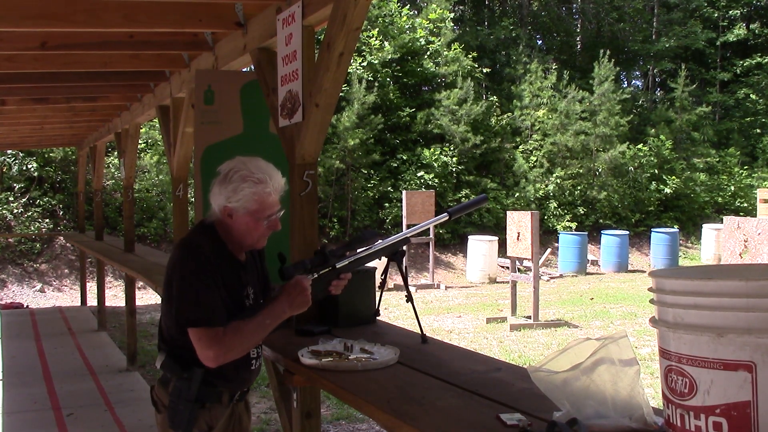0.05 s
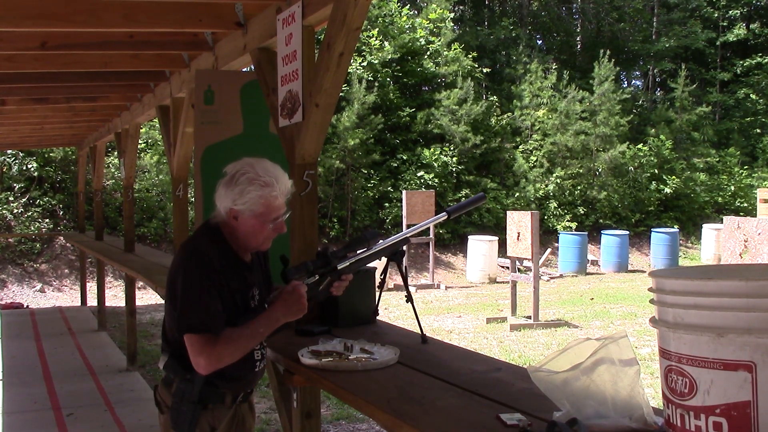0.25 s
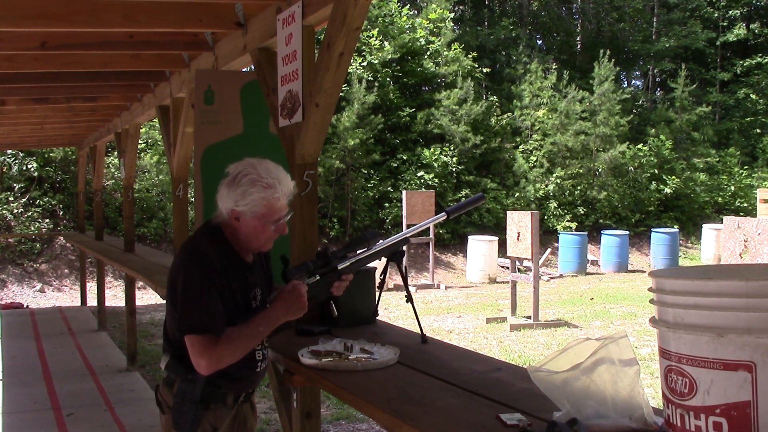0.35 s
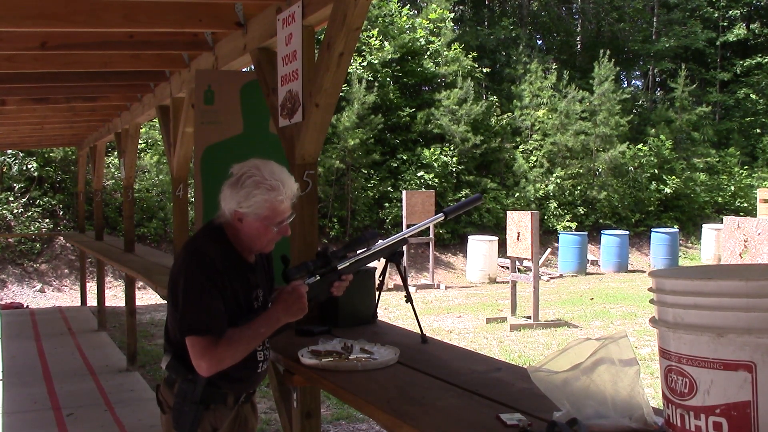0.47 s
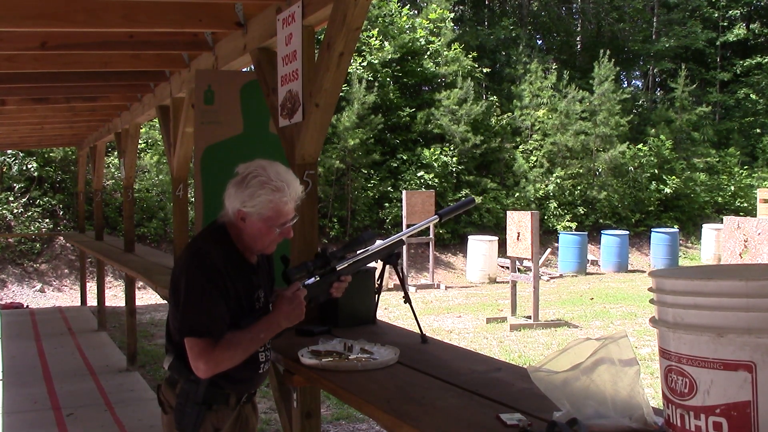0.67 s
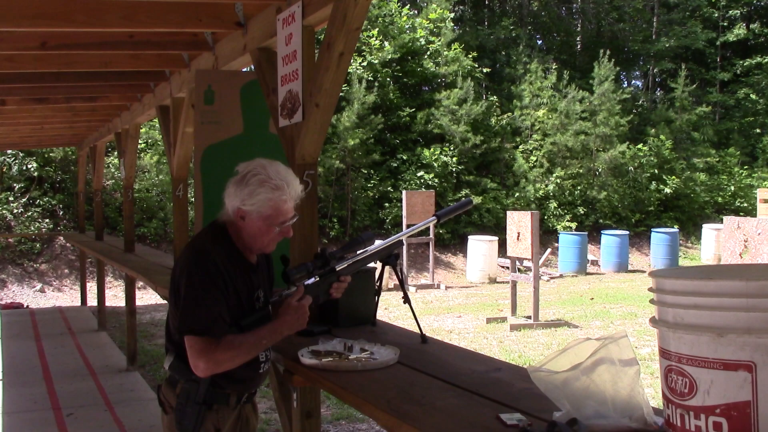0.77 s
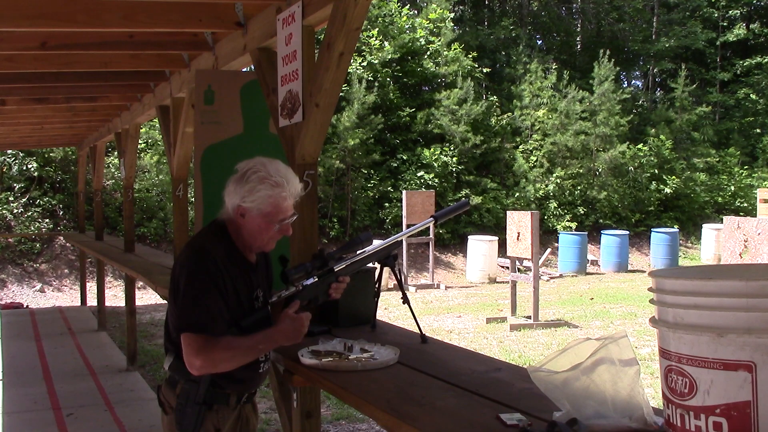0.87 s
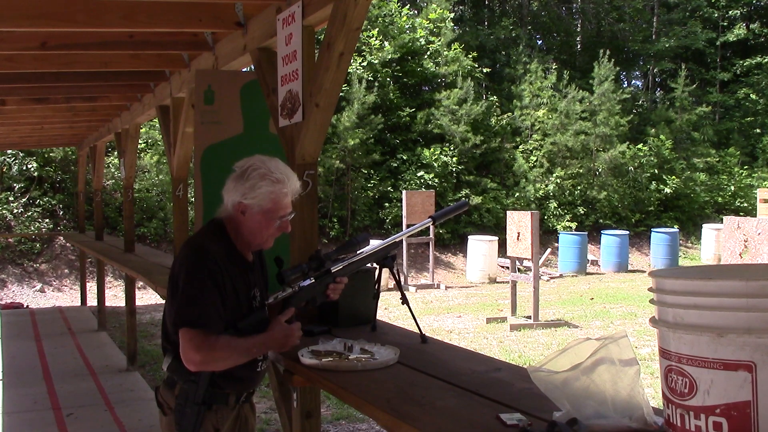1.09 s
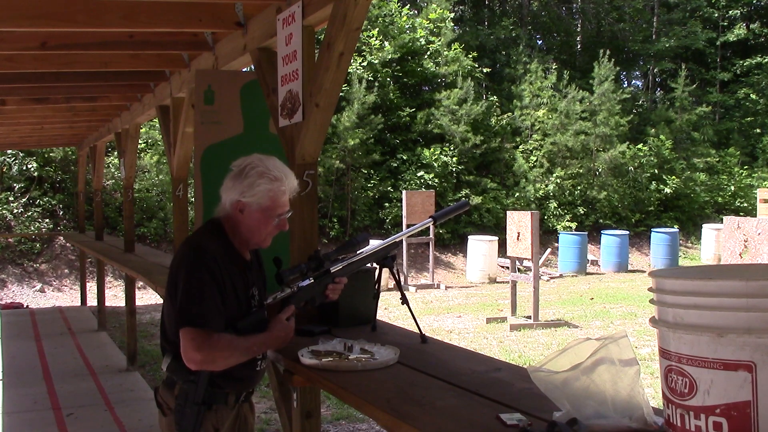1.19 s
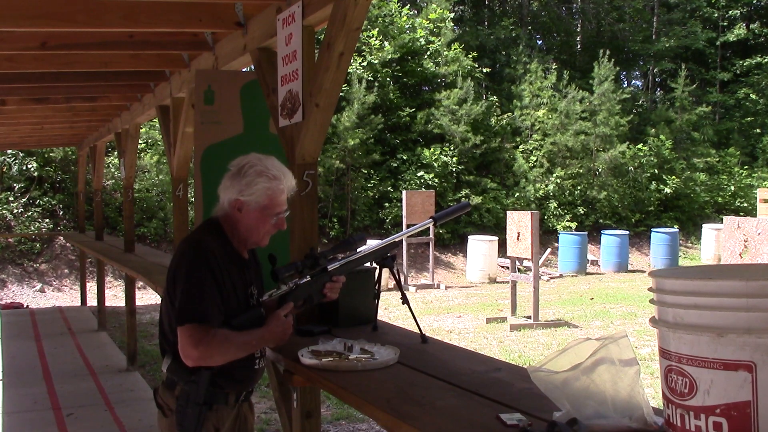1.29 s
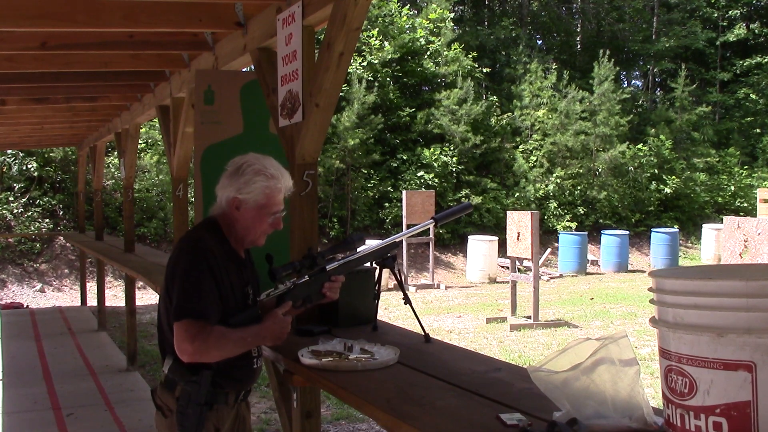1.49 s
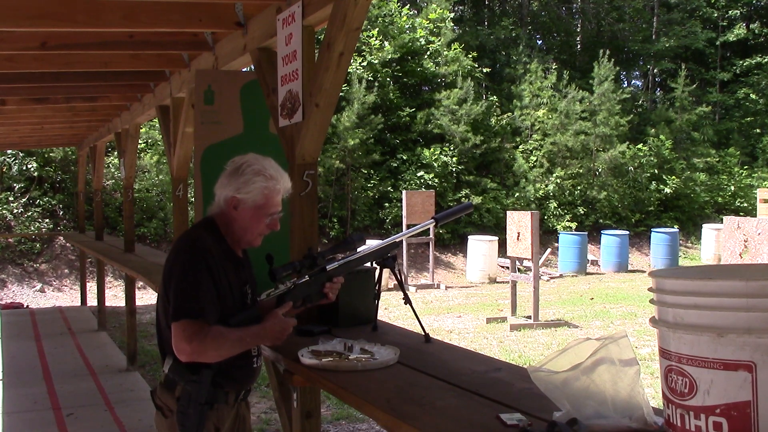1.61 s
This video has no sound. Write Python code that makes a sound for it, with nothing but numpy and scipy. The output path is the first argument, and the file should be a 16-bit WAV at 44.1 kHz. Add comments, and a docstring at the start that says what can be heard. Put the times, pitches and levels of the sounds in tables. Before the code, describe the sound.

Sharp metallic bolt clack, then an ejected cartridge case tinkles and knocks loudly on wooden planks

```python
"""First come a low drone, outdoor air and faint steel clicks: a rifle bolt is worked under a wooden shelter.
A spent brass case is flung out ringing, clacks onto the wooden bench, bounces and rolls; small clicks
and rustle of handling follow. Blows are noise bursts plus dying sines; the case is pairs of beating sines;
roll, rustle, air and drone are shaped noise, and the shelter adds sparse reflections.
Two close microphones: the right input is much weaker and adds its own hiss."""
import sys
import numpy as np
from scipy import signal
from scipy.fft import rfft, irfft
from scipy.io import wavfile
from scipy.ndimage import uniform_filter1d

SR = 44100
rng = np.random.default_rng(int(sys.argv[2]) if len(sys.argv) > 2 else 0)


def waveform_to_disk(signal):
    """Save audio, clipped to [-1, 1], as 16-bit WAV at the path in sys.argv[1]."""
    frames = np.transpose(np.atleast_2d(signal))
    scaled = np.clip(frames, -1, 1) * 32767
    samples = np.round(scaled).astype(np.int16)
    wavfile.write(sys.argv[1], SR, samples)


def volts_from_decibels(level):
    """Turn decibel levels (scalar or array-like) into linear amplitude factors."""
    exponent = np.asarray(level, float) / 20
    return 10 ** exponent


N = 72765  # length in samples

# Source levels below are set before the input gains, except the right hiss, which is added after them.
# colour of the outdoor air: (frequency [Hz], relative level [dB per Hz])
AIR_COLOUR = [(15, -42.5), (25, -7.5), (134, -17), (242, -6), (301, -6), (754, -13.5), (1480, -16.5),
              (2280, -16.5), (2910, -17), (6380, -22), (16000, -29)]
# loudness of the low drone: (time [s], level [dB])
DRONE_LEVEL = [(0.0, -54), (0.086, -51), (0.5, -54.5), (0.518, -64), (0.532, -39.5), (0.596, -69.5),
               (0.812, -66.5), (1.548, -59), (1.65, -56.5)]
# humps in the drone's spectrum: (frequency [Hz], width [Hz], relative level [dB])
DRONE_HUMPS = [(75, 22, -.1), (125, 28, -2), (163, 24, -6)]
# steel clicks of the action and of handling:
# (time [s], level of the noise [dB], tilt, at most 12 [dB per octave], t60 of the noise [s],
#  ring relative to the noise [dB])
STEEL_CLICKS = [(.0024, -45.5, -2, 0.26, -0.5), (.0548, -28, -4, 0.1, -1), (.085, -40, -4.5, 0.094, -33),
                (.11, -46, -1, 0.18, 5), (.2086, -19.5, 8, 0.04, -2.5), (.2144, -4, 12.5, .012, -62),
                (.219, -16, -0.7, 0.1, -15.5), (.258, -28, 4, .04, -26), (.2765, -23.5, -3.5, 0.15, -3),
                (.288, -18.5, 5, 0.016, -26), (.309, -38, 4, .05, 4), (.321, -39.5, -1.5, .06, -4),
                (.9835, -48, -6.5, 0.029, -27), (.9905, -46.5, 1, 0.11, -26), (1.0515, -51, 26, 0.015, -18),
                (1.079, -49, 2, 0.03, -4), (1.118, -49.5, -4.5, .03, -1), (1.274, -45.5, -0.5, .02, 0),
                (1.3175, -38.5, 6.5, .04, -30), (1.3498, -39, -3, 0.033, 6.5),
                (1.3985, -45.5, -1.5, 0.031, 9.5), (1.413, -44, 1, 0.061, -14),
                (1.5365, -50, -12.5, .04, -7), (1.57, -44.5, 23.5, 0.017, -36)]
# colour of a steel click: (frequency [Hz], relative level [dB per Hz])
STEEL_COLOUR = [(120, -48), (200, -16), (527, -20), (1030, -30), (1320, 3.5), (7310, -2.5), (9150, -5.5),
                (10700, -13), (12500, -7.5), (16200, -40), (22000, -120)]
# ringing tones of the action: (frequency [Hz], relative level [dB], t60, shortened to 0.01 in use [s])
ACTION_MODES = [(990, -2, 0.016), (1241, 7.1, 0.014), (1960, -15, 0.058), (2690, -6.5, 0.038),
                (3890, -11, .03), (4130, 0.5, 0.025), (4630, -15.5, .03)]
# echo decay of the shelter, at least 0.03 s in use: (frequency [Hz], t60 [s])
SHELTER_DECAY = [(150, 0.33), (530, 0.34), (1390, 0.35), (3680, 0.28), (8000, 0.3), (11500, 0.17),
                 (16000, 0.057)]
# the case is struck: (time [s], ringing time [s], then five levels [dB], for the families
#  near 6.5, 9.4, 13.1, 14.5 and 13.2 kHz)
CASE_STRIKES = [(.2144, .0146, -45, -33, -50, -38, -8), (.2297, .293, -55, -42, -23, -38, -21),
                (.258, .265, -46, -46, -34, -33, -60), (.308, .215, -42, -41, -46, -48, -70),
                (.568, .15, -70, -60, -43, -39, -60), (.608, .11, -66, -52, -52, -62, -70),
                (.742, .31, -68, -58, -60, -70, -75), (.808, .24, -72, -66, -63, -72, -72),
                (.862, .19, -72, -68, -65, -66, -75), (.92, .13, -76, -72, -72, -72, -80),
                (.988, .063, -56, -72, -75, -75, -80), (.999, .052, -62, -58, -69, -72, -70)]
# tones of the brass case, close beating partners, one entry each: (frequency [Hz])
CASE_HZ = [4580, 6471, 6530, 9414, 9436, 10930, 13060, 13105, 13130, 14522, 14563, 13156, 13289]
# which family each tone belongs to: (family number)
CASE_FAMILY = [0, 0, 0, 1, 1, 1, 2, 2, 2, 3, 3, 4, 4]
# strength of each tone within its family: (relative level [dB])
CASE_DB = [-10, 0, -8, -8, 0, -11, -12, 0, -8, 0, -6, 0, -15]
# how long each tone takes to fade by 60 dB: (t60 [s])
CASE_T60_S = [.4, .4, .3, .35, .36, .3, .15, .24, .3, .26, .24, .15, .06]
# knocks on the bench: (time [s], level of the ring [dB], tilt, at most 5 [dB per octave],
#  t60 of the crack [s], crack relative to the ring [dB])
BENCH_KNOCKS = [(.2762, -29.5, -6.5, 0.05, -19), (.2886, -31.5, -13, 0.039, -20),
                (.5233, -0.5, 2.4, 0.064, -5.5), (.532, -6, 1, 0.085, -8.5), (.551, -21, 8, 0.054, 0),
                (.5695, -18.5, 0, 0.036, 4), (.58, -23.5, 5, 0.09, -3.5), (.6093, -14.5, 1, 0.068, -1),
                (.648, -53, -16, .02, -5), (.68, -37, -2, 0.072, 7), (.7165, -23, 1, 0.061, 4),
                (1.568, -53.5, -22, 0.022, 9)]
# colour of the dry crack of wood: (frequency [Hz], relative level [dB per Hz])
CRACK_COLOUR = [(59, -66.5), (100, -30.5), (389, -2), (481, 0), (970, -1.5), (1250, -7.5), (1650, -8),
                (2170, -13.5), (3700, -15.5), (15000, -36.5), (16000, -68.5)]
# ringing tones of the bench top: (frequency [Hz], relative level [dB], t60, shortened in the roll [s])
BENCH_MODES = [(125, -20, .08), (240, -17, .06), (313, -12, .07), (466, -4, .07), (515, -6, .07),
               (591, 0, .08), (763, -12, .07), (900, -5, .07), (1000, -9, .06), (1350, -11, .05),
               (1500, -12, .04), (1640, -7, .05), (1845, -10, .04), (2274, -15, .04)]
# the case rumbles over the planks: (time [s], level [dB])
ROLL_LEVEL = [(0.77, -58), (0.866, -48.5), (0.878, -56), (1.016, -48), (1.126, -85), (1.14, -86),
              (1.15, -95)]
# handling rustle, one list per movement: (time [s], level [dB])
RUSTLE_LEVELS = [
    [(1.052, -50), (1.114, -67.5), (1.12, -70), (1.14, -83)],
    [(1.295, -78), (1.319, -54.5), (1.389, -65.5), (1.413, -55.5), (1.431, -61), (1.48, -57.5)],
    [(1.525, -78), (1.537, -55.5), (1.561, -71), (1.571, -58.5), (1.589, -60), (1.65, -73)],
]
# colour of the rustle: (frequency [Hz], relative level [dB per Hz])
RUSTLE_COLOUR = [(180, -31), (300, 5.5), (634, -2.5), (946, -6.5), (1390, -9), (3580, -18.5), (8790, -9.5),
                 (16000, -23)]

AIR_DB, SHELTER_DB = -63.5, -7.5  # air level; echoes relative to the dry sound
LEFT_DB, RIGHT_DB = 4, -17  # input gains
RIGHT_HISS_DB = -80.5
RIGHT_WET_DB, APART_HZ = -6.5, 2500  # share and lower edge of the right side's own reflections
MUTE_S, ONSET_S = .002, .0008  # fade-out and fade-in of each brass ring
TUMBLE_DB, TUMBLE_S = 3, .012  # depth and smoothing time of the flutter
GRIT = .6  # peak of the dry crack in each rolling bump, relative to the plank's ring
LOW_CUT_HZ, TOP_HZ = 258, 15900
CEILING = 1.0  # clipping level, full scale


def evened(x):
    """Scales to rms 1."""
    return x / np.sqrt(np.mean(x ** 2) + 1e-20)


def read(points, hz):
    """Reads a table on a log-frequency axis."""
    f, value = np.transpose(points)
    return np.interp(np.log(hz + 1), np.log(f + 1), value)


def level(curve):
    """Gain over time from a dB curve, fading to -110 dB outside it."""
    s, db = np.transpose(curve)
    times = np.r_[s[0] - .003, s, s[-1] + .02]
    return volts_from_decibels(np.interp(np.arange(N) / SR, times, np.r_[-110, db, -110]))


def add(mix, s, sound):
    """Mixes a sound in at time s."""
    part = mix[max(round(s * SR), 0):][:len(sound)]
    part += sound[:len(part)]


def highpass(x, hz):
    """Weakens everything below the given frequency."""
    return signal.sosfilt(signal.butter(2, hz, "high", fs=SR, output="sos"), x)


def coloured(white, points, tilt_db=0):
    """White noise shaped by a spectrum and a tilt around 2 kHz, at rms 1."""
    hz = np.fft.rfftfreq(len(white), 1 / SR)
    gain = volts_from_decibels(read(points, hz) + tilt_db * np.log2(hz / 2000 + 0.048))
    return evened(irfft(rfft(white) * gain, len(white)))


def ring(modes, t, tilt_db, pivot_hz, spot=1, longest_s=.15):
    """Dying sines, one per mode; spot weighs the modes by where the blow lands."""
    hz, db, t60 = np.transpose(modes)[:, :, None]
    db = db + tilt_db * np.log2(hz / pivot_hz) - 60 * t / np.clip(t60, .01, longest_s)
    return (np.reshape(spot, (-1, 1)) * volts_from_decibels(db) * np.sin(2 * np.pi * hz * t)).sum(0)


def burst(white, points, tilt_db, t60):
    """A sudden puff of noise through a filter of the given colour that only rings forward in time."""
    t, hz = np.arange(len(white)) / SR, np.fft.rfftfreq(len(white), 1 / SR)
    colour_db = read(points, hz) + tilt_db * np.log2(hz / 2000 + 0.085)
    # folding the cepstrum turns the gain into a minimum-phase filter
    fold = irfft(np.log(volts_from_decibels(np.maximum(colour_db, -90))))
    fold[1:len(t) // 2] *= 2
    fold[len(t) // 2 + 1:] = 0
    dying = white * volts_from_decibels(-60 * t / max(t60, .003))
    puff = irfft(rfft(dying) * np.exp(rfft(fold)))
    return puff / abs(puff).max()


def blows(table, modes, points, pivot_hz, rattle_s, longest_s, ring_first):
    """Each blow is a noise burst plus the body's modes, shaken by a short rattle at a varying spot."""
    out, t = np.zeros(N), np.arange(8192) / SR
    white = rng.standard_normal((len(table), 8192 + 2048 + len(modes)))
    rattle_fade = volts_from_decibels(-60 * t[:2048] / max(rattle_s, .001))
    for (s, db, tilt_db, t60, second_db), w in zip(table, white):
        tilt_db = min(tilt_db, 5 if ring_first else 12)
        spot = volts_from_decibels(w[10240:])  # each mode varies by about 1 dB
        body = ring(modes, t, tilt_db, pivot_hz, spot, longest_s)
        body = signal.fftconvolve(body, w[8192:10240] * rattle_fade)[:8192]
        body = body / abs(body).max()
        puff = burst(w[:8192], points, tilt_db, t60)
        first, second = (body, puff) if ring_first else (puff, body)
        add(out, s, volts_from_decibels(db) * (first + volts_from_decibels(second_db) * second))
    return out


def background():
    """Outdoor air as shaped noise, and a low wavering drone of noise in narrow bands."""
    hz = np.fft.rfftfreq(N, 1 / SR)
    bands = sum(volts_from_decibels(db) / (1 + (2 * (hz - f) / width) ** 2) for f, width, db in DRONE_HUMPS)
    drone = evened(irfft(rfft(rng.standard_normal(N)) * bands, N))
    air = volts_from_decibels(AIR_DB) * coloured(rng.standard_normal(N), AIR_COLOUR)
    return air + level(DRONE_LEVEL) * drone


def right_hiss():
    """Steady noise of the weak right input: the air's colour, tilted towards the treble."""
    return volts_from_decibels(RIGHT_HISS_DB) * coloured(rng.standard_normal(N), AIR_COLOUR, 1.5)


def action_clicks():
    """Steel parts meet: bursts of noise lead, with the short ring of the action added."""
    return blows(STEEL_CLICKS, ACTION_MODES, STEEL_COLOUR, 1500, rattle_s=0.023, longest_s=0.01,
                 ring_first=False)


def shelter(x):
    """Sparse random reflections from roof and posts, each band dying at its own speed."""
    taps = np.zeros((2, SR // 2))
    at = np.arange(100, SR // 2 - 20, 12)  # one reflection in every 12 samples
    at = at + rng.integers(0, 12, (2, len(at)))
    np.put_along_axis(taps, at, rng.choice([-1., 1.], at.shape), 1)
    hz, t, z = signal.stft(taps, SR, nperseg=256)
    t60 = np.maximum(read(SHELTER_DECAY, hz), .03)[:, None]
    tail = signal.istft(z * volts_from_decibels(-60 * t / t60), SR, nperseg=256)[1]
    tail[:, :100] = 0
    return signal.fftconvolve(x[None], tail / np.linalg.norm(tail[0]), axes=1)[:, :N]


def brass_case():
    """Each strike rings for its listed time, often over later strikes, and flutters as the case tumbles."""
    out = np.zeros((2, N))
    for s, length, *family_db in CASE_STRIKES:
        t = np.arange(0, length, 1 / SR)
        mode_db = CASE_DB + np.array(family_db)[CASE_FAMILY]
        modes = np.transpose([CASE_HZ, mode_db, CASE_T60_S])
        fade = np.minimum(np.minimum((length - t) / MUTE_S, t / ONSET_S), 1)
        for side in (0, 1):
            # partners beat in opposite sense on the two sides
            signs = (-1.) ** (side * np.arange(len(modes)))
            add(out[side], s, ring(modes, t, 0, 1, signs, longest_s=1) * fade)
    width = round(TUMBLE_S * SR)
    tumble = evened(uniform_filter1d(uniform_filter1d(rng.standard_normal(N), width), width))
    # the flutter grows in from the second strike
    spin_up = np.clip((np.arange(N) / SR - CASE_STRIKES[1][0]) / TUMBLE_S, 0, 1)
    return out * volts_from_decibels(TUMBLE_DB * tumble * spin_up)


def bench_knocks():
    """Blows on the wooden bench: the ring of its top leads, with a dry crack added."""
    return blows(BENCH_KNOCKS, BENCH_MODES, CRACK_COLOUR, 600, rattle_s=0.0022, longest_s=.1,
                 ring_first=True)


def rolling():
    """Dense tiny bumps excite the bench modes, damped by the weight of the case."""
    size = volts_from_decibels(2.5 * np.minimum(rng.exponential(1, N), 4))
    hit = rng.random(N) < 2500 / SR  # about 2500 bumps per second
    bumps = rng.standard_normal(N) * size * hit
    signs = (-1.) ** np.arange(len(BENCH_MODES))
    plank = ring(BENCH_MODES, np.arange(4000) / SR, -1.5, 600, signs, longest_s=.016)
    crack = burst(np.arange(2048) == 0, CRACK_COLOUR, .5, .01)
    plank[:2048] += GRIT * abs(plank).max() * crack
    return level(ROLL_LEVEL) * evened(signal.oaconvolve(bumps, plank)[:N])


def rustle():
    """Grainy noise of hand and sleeve: shaped noise whose loudness jitters quickly."""
    grain = volts_from_decibels(5.9 * evened(uniform_filter1d(rng.standard_normal(N), 90)))
    noise = coloured(rng.standard_normal(N), RUSTLE_COLOUR)
    return sum(level(curve) for curve in RUSTLE_LEVELS) * evened(noise * grain)


def scene():
    """All sources at the microphones; the right one hears other treble reflections."""
    near = action_clicks() + bench_knocks() + rolling() + rustle()
    near = highpass(near, LOW_CUT_HZ)
    wet = volts_from_decibels(SHELTER_DB) * shelter(near)
    both = near + wet[0] + background()
    right_extra = volts_from_decibels(RIGHT_WET_DB) * highpass(wet[1] - wet[0], APART_HZ)
    return brass_case() + [both, both + right_extra]


def low_pass(x):
    """Removes everything above the highest recorded frequency."""
    return signal.sosfilt(signal.butter(12, 16410, fs=SR, output="sos"), x)


def record(dry):
    """Unequal input gains, hiss of the weak input, treble limit and clipping."""
    x = dry * volts_from_decibels(np.array([[LEFT_DB], [RIGHT_DB]]))
    hiss = right_hiss()
    x = x + [0 * hiss, hiss]
    x = signal.sosfilt(signal.butter(10, TOP_HZ, fs=SR, output="sos"), x)
    mix = np.clip(x, -CEILING, CEILING)
    return low_pass(mix)


dry = scene()
out = record(dry)
waveform_to_disk(out)
```